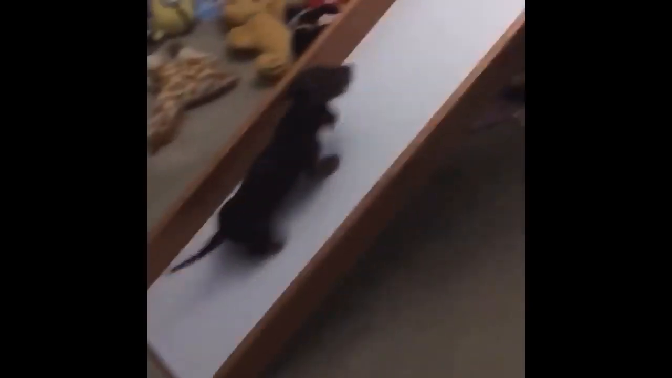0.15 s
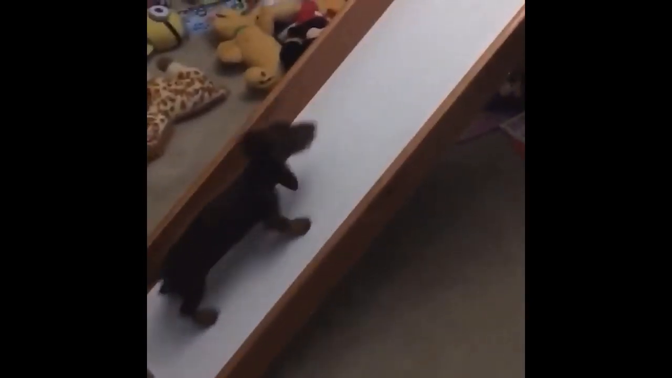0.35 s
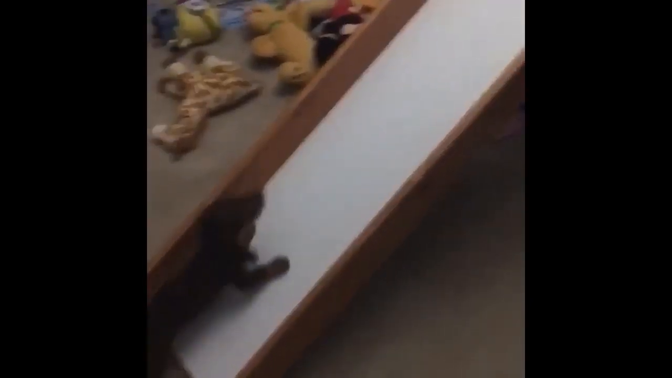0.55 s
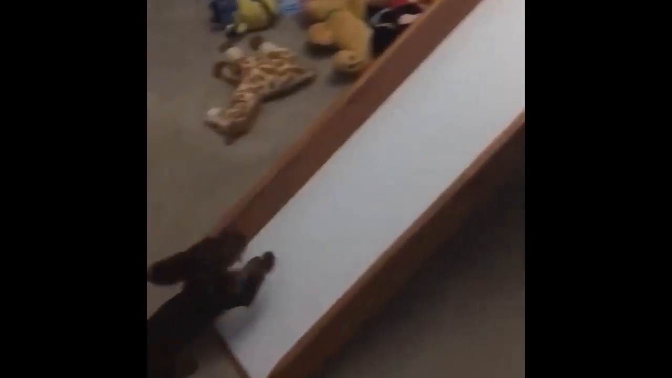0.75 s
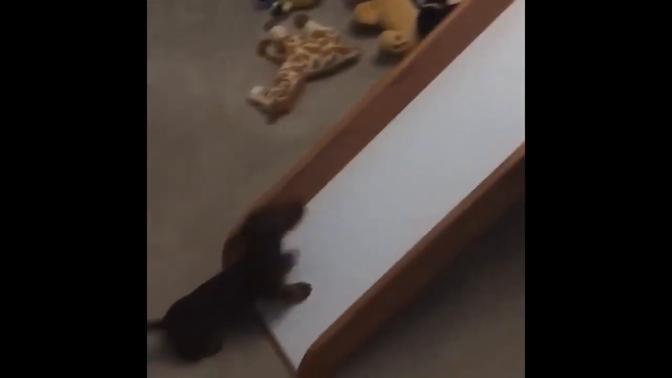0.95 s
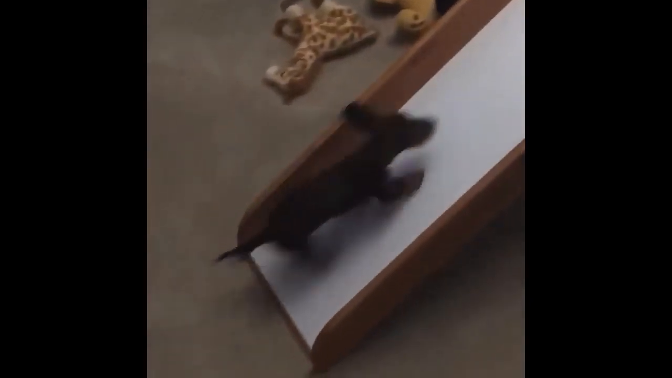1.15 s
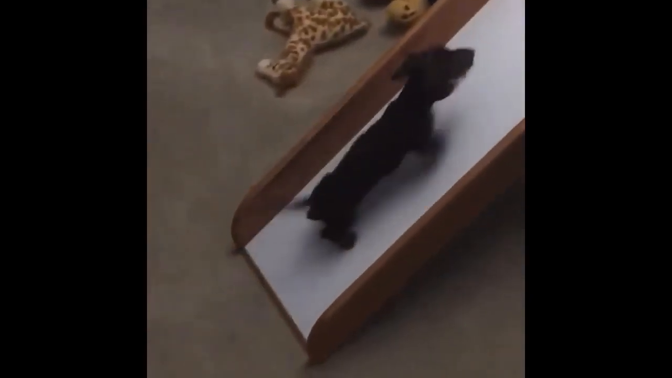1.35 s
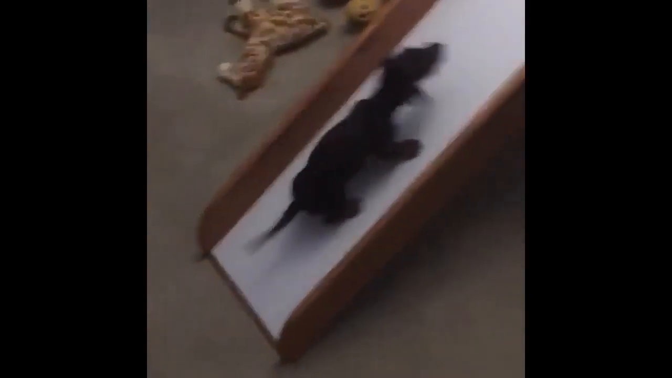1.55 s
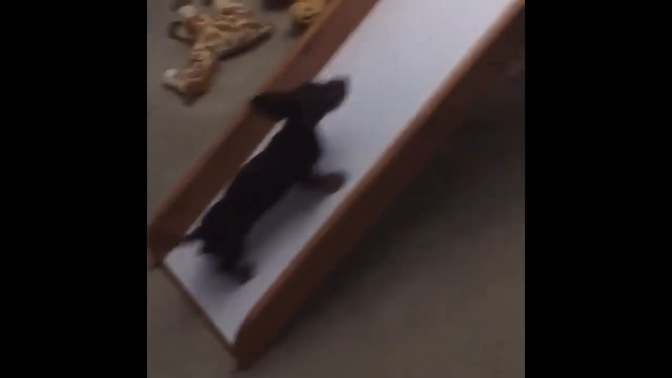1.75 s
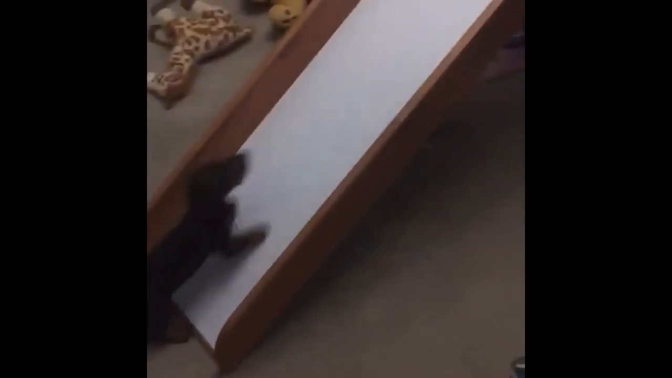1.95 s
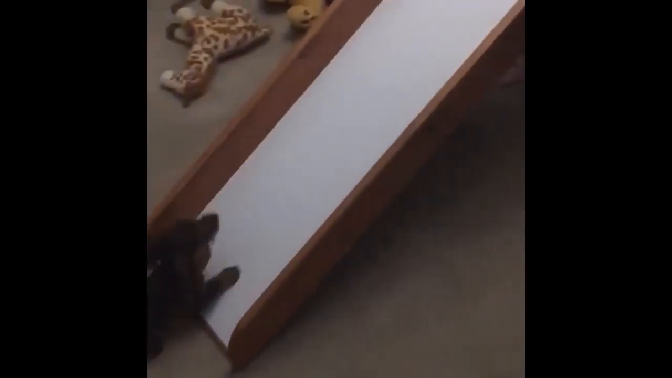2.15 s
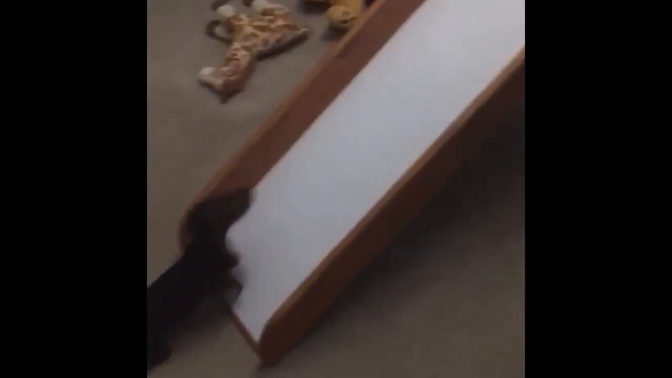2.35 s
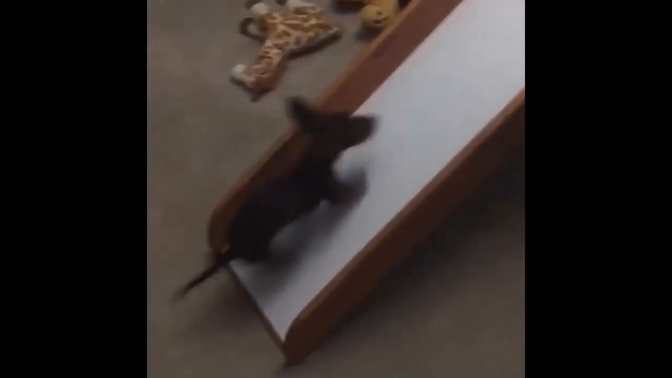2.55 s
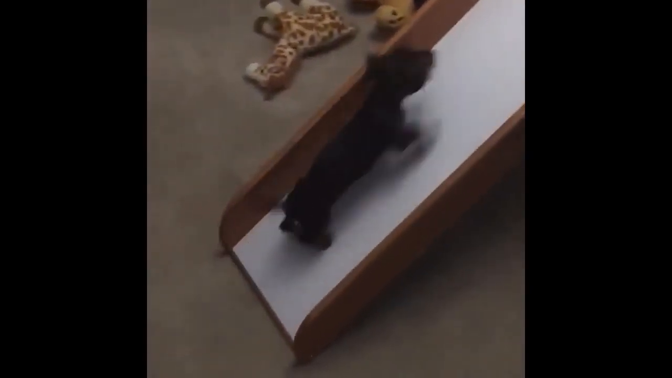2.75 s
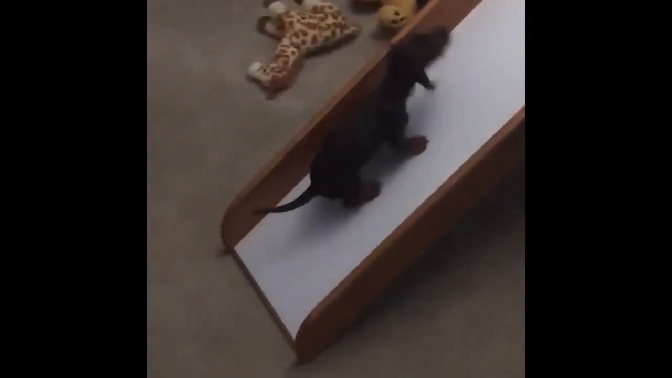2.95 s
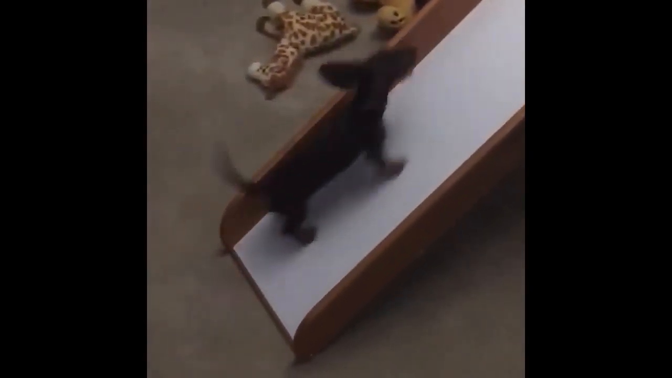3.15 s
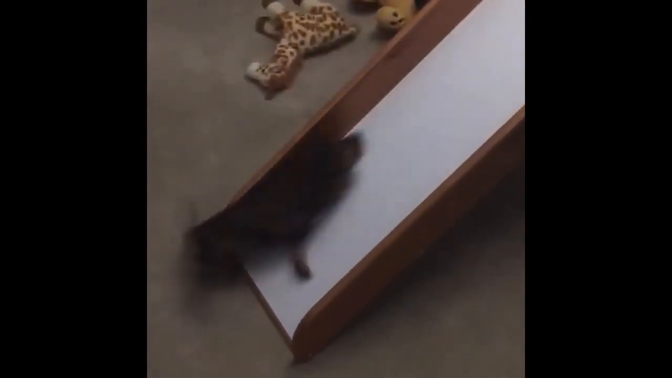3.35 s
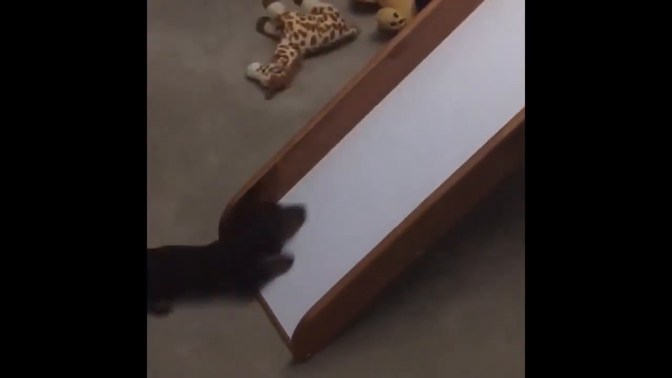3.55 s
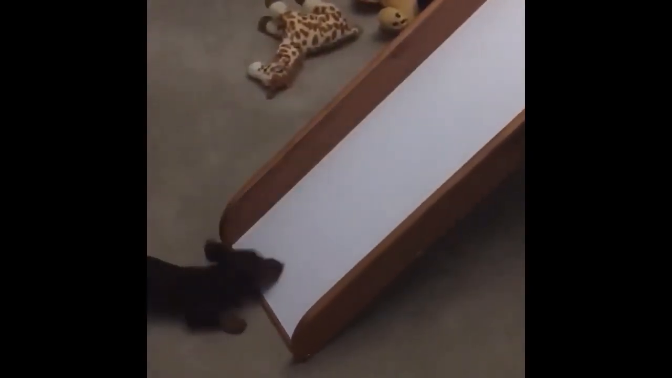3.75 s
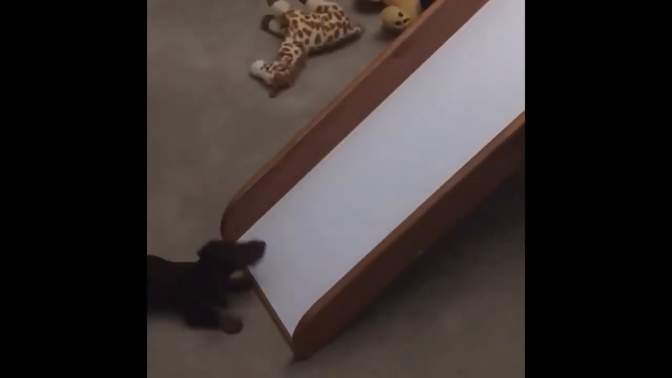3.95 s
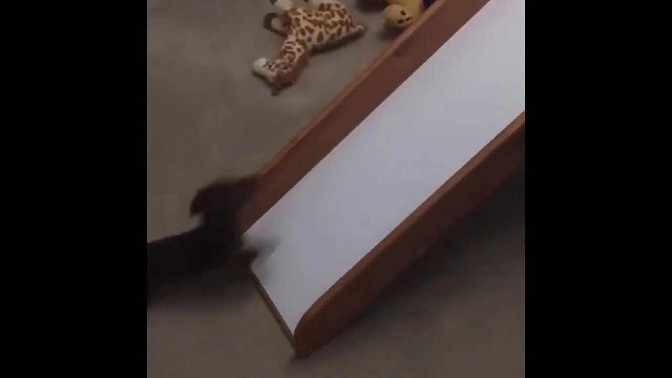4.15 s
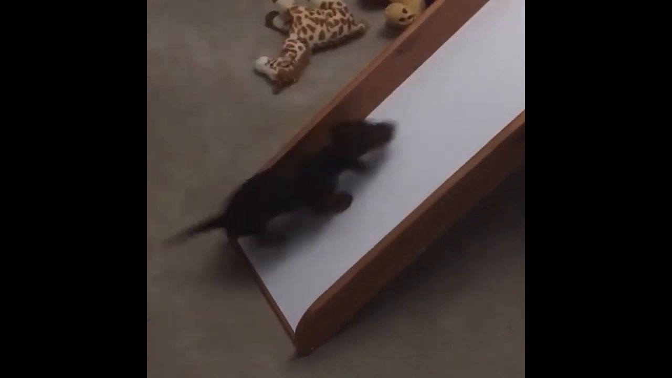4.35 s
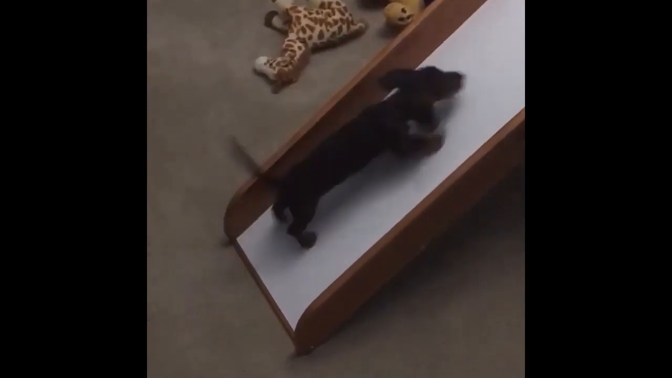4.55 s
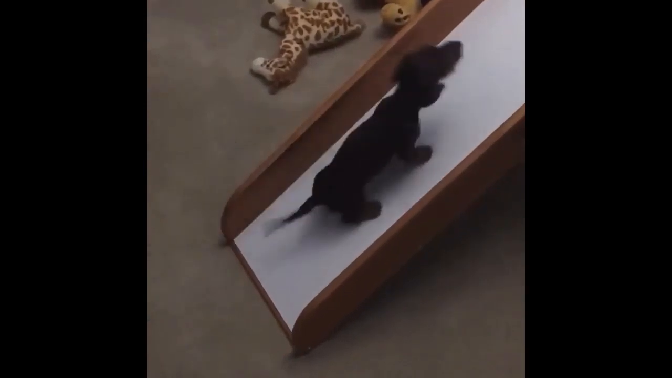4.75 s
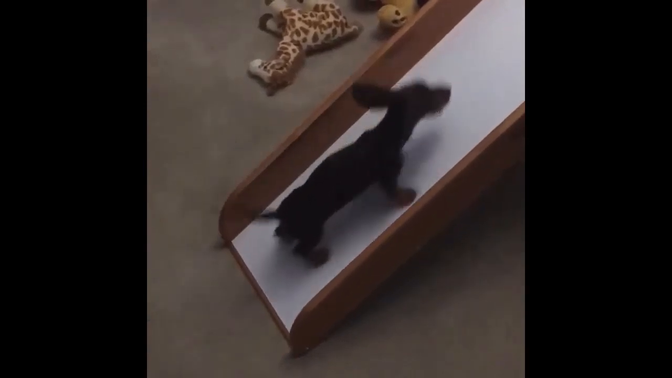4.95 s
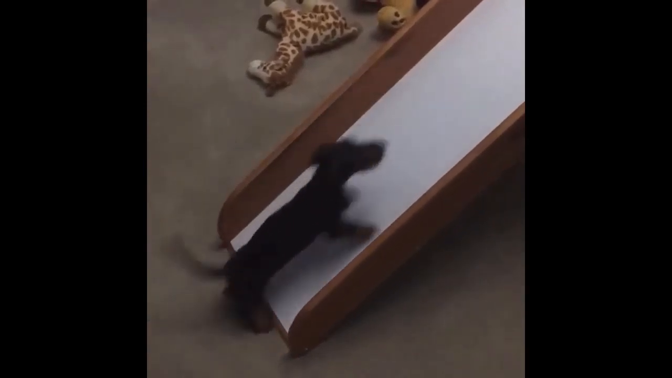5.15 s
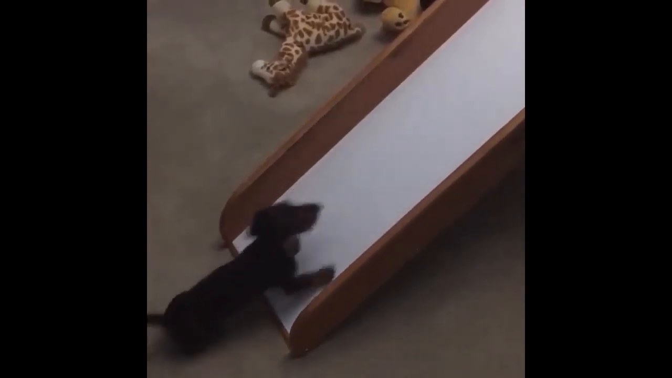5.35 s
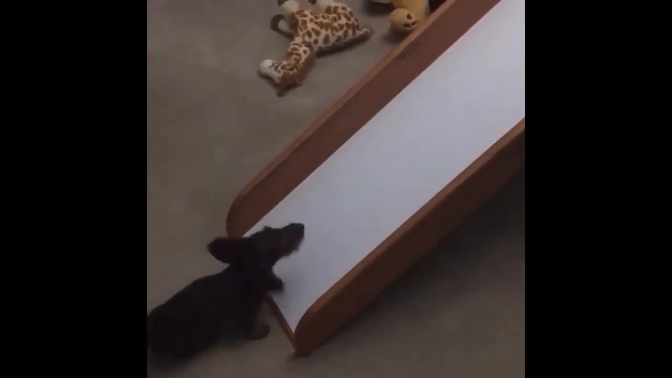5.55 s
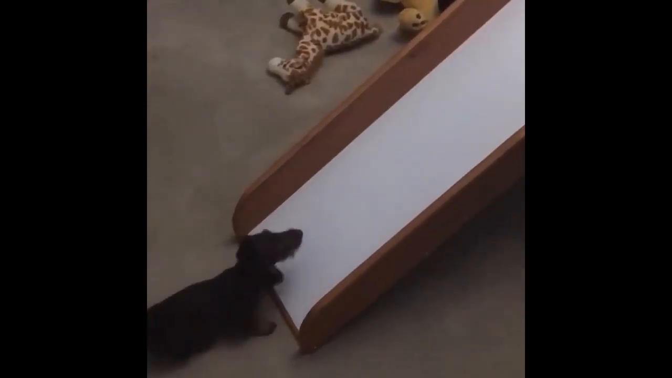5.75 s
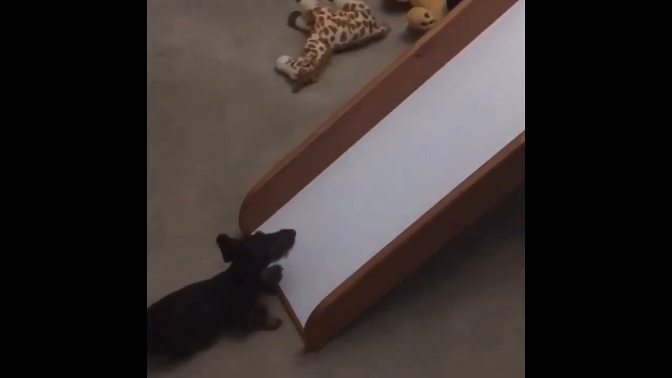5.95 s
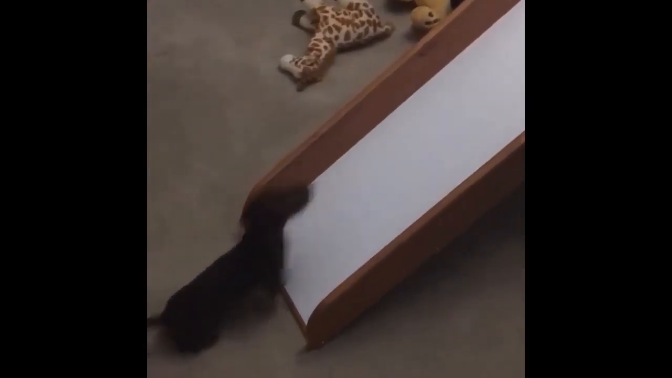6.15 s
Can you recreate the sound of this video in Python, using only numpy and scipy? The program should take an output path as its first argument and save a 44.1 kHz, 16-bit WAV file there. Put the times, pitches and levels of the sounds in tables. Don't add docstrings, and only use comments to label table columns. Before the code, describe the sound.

Irregular bursts of hollow wooden thumps and sharp claw scrabbling alternate with soft scraping slides as a small dog tries to climb a ramp. The heaviest blows come around the middle. Movement then thins out and the dog whimpers, high and nasal, cracking slightly before fading. Close handheld mono sound, short soft indoor echo, faint handling rumble and tiny steady ticks.

```python
import sys
import numpy as np
from scipy import signal
from scipy.fft import rfft, irfft, next_fast_len
from scipy.io import wavfile
from scipy.ndimage import uniform_filter1d

SR = 44100
rng = np.random.default_rng(int(sys.argv[2]) if len(sys.argv) > 2 else 0)


def store_wav(level_fs):
    pcm = np.round(np.clip(np.atleast_2d(level_fs), -1, 1) * 32767)
    wavfile.write(sys.argv[1], SR, pcm.T.astype(np.int16))


def elevation(decibels):
    levels = np.asarray(decibels, float)
    return 10 ** (levels / 20)


N = 272972
FAST = next_fast_len(N)

# (frequency [Hz], level [dB], ring time t60 [s])
BOARD_MODES = [(46.2, -2.5, 0.36), (63.8, -1.5, 0.4), (135.2, 1.5, 0.4), (151.4, 1.5, 0.39),
               (190.4, 6.5, 0.15), (218, -8, 0.65), (284.4, 2, 0.33), (329.3, -6, 0.43),
               (388.6, -0.5, 0.21), (460, -11, 0.13), (526, -7.5, 0.1), (640, 2.5, 0.024),
               (780, -10.5, 0.079), (878, 0.5, 0.014), (1110, -10.5, 0.05), (1146, -12, 0.097),
               (1360, -6, 0.034)]
# (time [s], peak [dB], board note [Hz], weight at 40-100 Hz [dB])
LUNGES = [(0.272, -32, 214, -30), (0.399, -40, 166, -33.5), (0.801, -44, 147, -46),
          (1.058, -38, 260, -36.5), (1.693, -42, 200, -44), (1.764, -44, 108, -51), (2.54, -41.5, 142, -47),
          (2.834, -30, 151, -25.5), (3.142, -90, 218, -31), (3.484, -45, 203, -25),
          (3.509, -25, 100, -21.5), (3.631, -37, 150, -29.5), (3.683, -44, 123, -50),
          (3.895, -58, 126, -41), (4.301, -52, 169, -53), (4.656, -48, 193, -43), (5.349, -44, 152, -45),
          (5.682, -41, 140, -45)]


def level(x, db):
    return x * elevation(db) / np.sqrt(np.mean(x ** 2))


def curve(table):
    s, *columns = np.transpose(table)
    return [np.interp(np.arange(N) / SR, s, c) for c in columns]


def colour(x, points):
    hz, db = np.transpose(points)
    f = np.fft.rfftfreq(FAST, 1 / SR) + 1
    gain = elevation(np.interp(np.log(f), np.log(hz), db, left=-80))
    return irfft(rfft(x, FAST) * gain, FAST)[:N]


def band(x, lo_hz, hi_hz, order=2):
    edges = [lo_hz, min(hi_hz, .45 * SR)]
    return signal.sosfilt(signal.butter(order, edges, "band", fs=SR, output="sos"), x)


def walk(rate):
    k = int(SR / rate)
    steps = np.repeat(rng.standard_normal(N // k + 1), k)
    return 1.48 * uniform_filter1d(uniform_filter1d(steps, k), k)[:N]


def add(out, s, sound):
    i = max(int(s * SR), 0)
    out[i:i + len(sound)] += sound[:N - i]


def landings():
    # (time [s], peak [dB], board note [Hz], knock at 450-1500 Hz [dB])
    slaps = [(0.004, -34, 218, -36.5), (0.096, -29, 158, -35.5), (0.239, -38, 168, -35.5),
             (0.386, -38, 169, -33.5), (1.034, -28, 241, -41), (1.119, -44, 119, -48),
             (1.286, -31, 194.4, -37.5), (1.389, -29.5, 190, -40), (1.414, -27.5, 180, -40),
             (1.451, -32.5, 150, -43.5), (1.521, -41, 287, -39.5), (1.584, -33.5, 129, -43),
             (2.289, -35, 167, -50), (2.736, -30.5, 188, -37.5), (2.808, -31.5, 188, -52),
             (2.82, -21.5, 185, -28), (2.922, -32.5, 158, -43), (2.975, -31, 146, -41),
             (3.112, -32, 205, -33), (3.417, -37.5, 198, -50), (3.449, -19.5, 174, -26.5),
             (3.476, -19.5, 226, -21.5), (3.615, -36, 316, -33.5), (4.111, -45, 314, -48),
             (4.467, -31.5, 202, -37.5), (4.586, -19.5, 177.6, -24.5), (4.7, -30.5, 157, -37.5),
             (4.734, -30, 200, -35.5)]
    # (time [s], peak [dB], board note [Hz])
    pats = [(0.67, -40.5, 186), (0.922, -45, 168), (1.83, -44.5, 275), (2.098, -43.5, 128),
            (2.704, -41.5, 216), (3.284, -49, 172), (3.844, -46.5, 169), (3.897, -52, 125),
            (4.88, -41.5, 171), (5.006, -47, 148), (5.313, -44, 152)]
    rows = [(s, db, hz, db - 12.5, knock, 0.89, 0) for s, db, hz, knock in slaps]
    rows += [(s, db, hz, weight, db - 16, 0.47, -10) for s, db, hz, weight in LUNGES]
    rows += [(s, db, hz, db - 9, db - 8, 1, 0) for s, db, hz in pats]
    return rows


def paws():
    out, t = np.zeros(N), np.arange(SR // 3) / SR
    hz, mode_db, t60 = np.array(BOARD_MODES).T[:, :, None]
    push_s, damp_power = .006, 0.27
    hard_damp = 0.22
    rows = landings()
    chance = rng.standard_normal((len(rows), 2, len(BOARD_MODES), 1))
    for row, (size, detune) in zip(rows, chance):
        s, peak_db, note_hz, weight_db, knock_db, ring, muffle_db = row
        near_db = peak_db + muffle_db - 9.5 - 9 * np.abs(np.log2(hz / note_hz))
        db = np.where(hz < 100, weight_db + 3.5, np.where(hz < 450, near_db, knock_db - 0.5))
        db = db + mode_db + 1.9 * size
        rise = (1 - np.exp(-t * hz / 0.5)) ** 2
        ring_share = max(ring * elevation(-hard_damp * max(peak_db + 31.0, 0)), .2)
        pad_damping = np.where(hz < 450, np.minimum(note_hz / hz, 1) ** damp_power, 1)
        fade = elevation(-60 * t / (t60 * ring_share * pad_damping))
        rings = elevation(db) * rise * fade * np.sin(2 * np.pi * hz * (1 + 0.0445 * detune) * t + 3 * detune)
        push = (t / push_s) * np.exp(1 - t / push_s)
        fall_s = .022 if muffle_db else .035
        turns = 1.22 * note_hz * fall_s * (1 - np.exp(-t / fall_s))
        slap = elevation(peak_db - 4.0) * push * np.sin(2 * np.pi * turns)
        add(out, s - .0002, rings.sum(axis=0) + slap)
    return out


def thumps():
    # (time [s], peak [dB], start pitch [Hz], end pitch [Hz])
    blows = [
        (1.6945, -26.5, 314, 61),
        (1.7655, -35.5, 140, 56),
        (3.136, -29, 88, 54),
        (1.074, -33, 114, 63),
    ]
    sink_s = 0.0071
    out, t = np.zeros(N), np.arange(SR // 8) / SR
    for s, db, start_hz, end_hz in blows:
        turns = end_hz * t + (start_hz - end_hz) * sink_s * (1 - np.exp(-t / sink_s))
        rise_s = .006 * np.sqrt(330 / start_hz)
        push = (t / rise_s) * np.exp(1 - t / rise_s)
        add(out, s, -elevation(db) * push * np.sin(2 * np.pi * turns))
    return out


def raps():
    # (time [s], peak [dB], note [Hz])
    knocks = [(0.094, -30, 1280), (0.237, -32, 640), (0.387, -27, 1172), (1.107, -32, 721),
              (1.46, -34, 635), (1.827, -30.5, 1730), (2.083, -38, 1180), (2.294, -33.5, 790),
              (2.369, -51, 1360), (2.42, -36, 1380), (2.505, -36, 1560), (2.706, -37, 592),
              (2.821, -33, 666), (2.921, -31, 1220), (3.111, -28.5, 595), (3.285, -30, 1420),
              (3.447, -19, 604), (3.485, -23, 690), (3.529, -27.5, 1180), (3.618, -32, 590),
              (4.102, -43, 610), (4.465, -29.5, 680), (4.548, -38, 1540), (4.587, -25.5, 606),
              (4.695, -29, 600), (4.96, -43, 1640), (0.008, -36.5, 520), (0.028, -34, 330),
              (0.274, -37, 440), (1.035, -31, 425), (1.054, -31, 380), (1.085, -38, 400),
              (0.925, -42.5, 328), (1.284, -34.5, 480), (1.79, -39, 1200), (2.432, -39, 1350),
              (2.451, -39, 880), (2.467, -39, 1300), (1.39, -38, 560), (1.413, -38, 640), (1.521, -37, 620),
              (3.305, -38, 650)]
    ring_cycles, twin_ratio, twin_db = 15.6, 1.914, -8
    out, t = np.zeros(N), np.arange(SR // 10) / SR
    for s, db, hz in knocks:
        twin_hz = hz * twin_ratio if hz < 900 else hz / twin_ratio
        fade = (1 - np.exp(-t / 0.0005)) * elevation(-60 * t * np.sqrt(hz * 800) / ring_cycles)
        modes = np.sin(2 * np.pi * hz * t) + elevation(twin_db) * np.sin(2 * np.pi * twin_hz * t)
        add(out, s, elevation(db - 1) * fade * modes)
    return out


def claws():
    # (time [s], peak [dB], sharp edge [dB], scratch t60 [s])
    skidding = [(0.0945, -20.5, 3.5, 0.19), (0.275, -28.5, -18, 0.2), (0.388, -24, -25, 0.16),
                (0.926, -32, 3, 0.12), (1.0337, -23.5, 7, 0.14), (1.284, -25, -10, 0.15),
                (1.3314, -25, -17, 0.13), (1.4117, -28, -7, 0.18), (1.5201, -21.5, 1, 0.26),
                (1.5809, -20, -1, 0.19), (1.83, -20.5, -22, 0.096), (1.897, -25, -8, 0.1),
                (2.287, -21, 2, 0.091), (2.7058, -22.5, 2, 0.12), (2.7331, -23, -10, 0.12),
                (2.796, -34, -7, 0.11), (2.825, -25.5, -7, 0.082), (2.9218, -15.5, -10, 0.15),
                (2.9768, -20.5, -14, 0.21), (3.282, -23, -1, 0.26), (3.426, -28, -20, 0.21),
                (3.5205, -26, -28, 0.11), (4.4685, -27, -12, 0.24), (4.6966, -14, 3, 0.068),
                (4.7326, -23, -12, 0.083), (4.773, -35, -17, 0.12), (4.9515, -37, -19, 0.36),
                (5.0007, -24, 2, 0.13), (5.057, -25, -29, 0.18)]
    # (time [s], peak [dB], wood note at 1-1.8 kHz [dB])
    tips = [(1.461, -30, -9), (1.706, -27, -29), (2.8692, -28, -36), (3.1115, -32, 0), (3.494, -21.5, -8.5),
            (3.531, -23.5, -8), (3.6196, -29.5, -3), (3.88, -32.5, -4.5), (4.301, -48, 0), (4.594, -27, -7),
            (4.662, -34, 0.5), (4.905, -37.5, -14), (5.43, -32, -9), (5.774, -42, -6), (6.0197, -53, -3)]
    strikes = [(s, db, -14, edge, t60) for s, db, edge, t60 in skidding]
    strikes += [(s, db, wood, -44, 0.071) for s, db, wood in tips]
    out, t = np.zeros(N), np.arange(SR // 5) / SR
    chance = rng.standard_normal((len(strikes), 2, len(t)))
    for (s, peak_db, wood_db, edge_db, t60), (noise, grit) in zip(strikes, chance):
        tick = np.exp(-t / 0.00025)
        scratch = 0.36 * (1 - np.exp(-t / 0.00058)) * elevation(-60 * t / max(t60, .01))
        skid = noise * elevation(3.1 * grit) * (tick + scratch)
        parts = [(band(skid, 3620, 5250), peak_db - 15.0), (band(skid, 3890, 8720), peak_db - 6.0),
                 (band(skid, 1056, 1760), peak_db + wood_db - 3.5),
                 (band(skid, 7700, 13400), peak_db + edge_db - 20.5)]
        add(out, s - .0005, sum(elevation(db) * p / np.abs(p).max() for p, db in parts))
    return out


def scrapes():
    # (time [s], rms [dB], swell [s], fade [s], start [Hz], end [Hz])
    rubs = [
        (0.169, -50.5, 0.021, 0.0084, 3480, 4170),
        (1.095, -37, 0.032, 0.025, 1140, 3700),
        (2.49, -47, 0.015, 0.025, 890, 1580),
        (4.09, -60, 0.016, 0.026, 900, 1230),
    ]
    out, t = np.zeros(N), np.arange(SR // 5) / SR
    for s, db, swell, fade, start_hz, end_hz in rubs:
        roughness = 6.7 * uniform_filter1d(rng.standard_normal(len(t)), 64)
        grit = rng.standard_normal(len(t)) * elevation(2.9 * roughness)
        shape = np.where(t < swell, t / swell, np.exp(-(t - swell) / fade))
        along = np.clip(t / swell, 0, 1)
        dull = level(band(grit, 0.5 * start_hz, 1.9 * start_hz), db)
        bright = level(band(grit, 0.74 * end_hz, 1.36 * end_hz), db)
        add(out, s, shape * ((1 - 0.54 * along) * dull + along * bright))
    return out


def slides():
    # (full speed from [s], to [s], hiss [dB], extra drag of a pressed pad [dB])
    slips = [(0, 0.03, -51, 1), (0.314, 0.393, -53, 2.5), (0.373, 0.608, -53.5, 2),
             (0.586, 0.677, -49.5, -2.5), (.69, 0.793, -54.5, 1.5), (0.977, 1.19, -65.5, 1),
             (1.45, 1.8, -57.5, 3.5), (1.76, 2.026, -51, -0.5), (2.063, 2.169, -48.5, -3.5),
             (2.13, 2.215, -53.5, -1), (2.267, 2.475, -58, 5.5), (2.86, 2.917, -50.5, 0),
             (2.9, 3.286, -57.5, 3), (3.305, 3.39, -48, -4.5), (3.417, 3.482, -45.5, -2),
             (3.46, 3.553, -51, -10), (3.586, 3.71, -56, 2), (3.69, 3.854, -54, -1),
             (3.995, 4.55, -83, 6.5), (4.615, 4.696, -55.5, 0.5), (4.68, 4.781, -54, 0),
             (4.78, 4.95, -67, 1), (4.969, 5.304, -54, 1), (5.093, 5.12, -52, -10), (5.26, 5.403, -52, 0),
             (5.43, 5.675, -55.5, -1), (2.505, 2.535, -54.5, 0), (3.5, 3.533, -54, -10)]
    dig_db = [0.5, 0, -0.8, 0, 4.5, -0.5, -0.5, 0.5, 1.5, 1, 3.5, -1.5, 0, -2.5, -10, -1, -2.5, 1, 11, -1,
              -3.5, 1, 2.5, -1.5, 5, -1, -5, 10]
    gather_db_s, stop_db_s = 159, 240
    t = np.arange(N) / SR
    start, end, db, press = np.array(slips).T[:, :, None]
    hiss = db - gather_db_s * np.maximum(start - t, 0) - stop_db_s * np.maximum(t - end, 0)
    scratch = -44 + 1.19 * (hiss + 44) - 0.12 * press + np.array(dig_db)[:, None]
    return hiss.max(axis=0), (hiss + press).max(axis=0), scratch.max(axis=0)


def slipping():
    # (frequency [Hz], level per Hz [dB])
    drag_spectrum = [(150, -43), (250, -8), (282, -4), (510, -21), (557, -17), (698, -5.5), (955, -6),
                     (1200, 1), (2760, -3), (4190, 7.5), (4990, 0.5), (9010, 1), (16000, -22.5)]
    grains = rng.standard_normal(N) * elevation(2.5 * np.minimum(rng.exponential(size=N), 3))
    spectrum = rfft(level(colour(grains, drag_spectrum), 0), FAST)
    octave = np.log2(np.fft.rfftfreq(FAST, 1 / SR) + 1)
    hiss_db, drag_db, scratch_db = slides()
    out, judder_db = 0, 1.3 * walk(45)
    for hz in 250 * 2 ** np.arange(0, 6.5, .5):
        share = np.clip(1 - np.abs(octave - np.log2(hz)) / .5, 0, 1)
        if hz < 2400:
            db = drag_db + 8.5
        elif hz < 6800:
            db = hiss_db + 6.5
        else:
            db = scratch_db + 5.0
        out = out + irfft(spectrum * share, FAST)[:N] * elevation(db + judder_db + 2.0 * walk(18))
    return out


def whine():
    # (time [s], pitch [Hz], hum through the nose [dB], mouth [dB])
    calls = [
        [(5.36, 898, -42, -75), (5.376, 897, -48, -70), (5.39, 1054, -51, -74), (5.412, 1128, -37, -66),
         (5.425, 1213, -51, -66), (5.433, 1215, -31.5, -60), (5.441, 1240, -50, -55)],
        [(5.441, 1230, -49, -56), (5.45, 1237, -33.5, -51), (5.462, 1248, -43, -51), (5.498, 1228, -43, -61),
         (5.52, 1207, -30, -52), (5.543, 1178, -40, -62), (5.556, 1165, -35, -55), (5.573, 1130, -30, -49.5),
         (5.585, 1110, -54, -50)],
        [(5.585, 1110, -56, -59), (5.606, 1145, -41, -57), (5.626, 1135, -50, -54), (5.645, 1140, -55, -51),
         (5.666, 1124, -43, -52), (5.68, 1117, -61, -61), (5.715, 1134, -56, -63)],
        [(5.725, 1515, -57, -63), (5.742, 1522, -59, -54), (5.768, 1560, -60, -55), (5.8, 1512, -52, -52.5),
         (5.826, 1488, -54, -49.5), (5.866, 1448, -51, -49), (5.878, 1440, -53, -58), (5.925, 1420, -60, -69),
         (6.0, 1160, -68, -105)],
        [(5.64, 1237, -59, -60), (5.664, 1273, -56, -51), (5.685, 1310, -53, -48), (5.7, 1395, -53, -60),
         (5.72, 1550, -64, -62)],
        [(6.012, 1080, -61, -68), (6.028, 1062, -57, -61), (6.056, 1000, -64, -63), (6.084, 945, -66, -64),
         (6.11, 885, -62, -65), (6.126, 862, -62, -61), (6.165, 838, -55, -65), (6.18, 812, -58, -71)],
    ]
    # (frequency [Hz], level [dB])
    open_mouth = [(2300, -9), (3300, 1), (4350, 6.5), (4800, -5), (5720, -3), (6000, 6), (7500, -16),
                  (9000, -37)]
    # (frequency [Hz], level [dB])
    shut_mouth = [(1900, -25), (2130, -8), (2800, -26), (3200, -10), (3500, -22), (4050, 2), (5600, -6),
                  (7000, -28)]
    lips_shut = [False, False, False, False, True, True]
    tilts = [-6, -11, -8, -4, 0, 0]
    depths = [.5, .5, .7, .8, 1, .7]
    # (from [s], to [s], depth [0-1])
    cracks = [
        (5.615, 5.645, .5),
        (5.772, 5.788, .5),
    ]
    out = np.zeros(N)
    t = np.minimum(np.arange(N) / SR, calls[-1][-1][0] - .01)
    tremble = 1 + .005 * walk(110) + .009 * walk(500)
    waver = [(1.5 + .4 * k) * walk(90) + 2.8 * min(k, 1) * walk(30) for k in range(9)]
    crack = sum(d * np.clip(np.minimum(t - a, b - t) / .004 + .5, 0, 1) for a, b, d in cracks)
    rasp = level(colour(rng.standard_normal(N), open_mouth), -10)
    for call, tilt, depth, shut in zip(calls, tilts, depths, lips_shut):
        mouth_hz, shape_db = np.transpose(shut_mouth if shut else open_mouth)
        hz, nose_db, mouth_db = curve(call)
        partial_db = [nose_db]
        for n in range(2, 10):
            resonance_db = np.interp(np.log(n * hz), np.log(mouth_hz), shape_db)
            partial_db.append(mouth_db + resonance_db + tilt * np.log2(n * hz / open_mouth[2][0]))
        strain = np.clip((mouth_db + 53.5) / 4.5, 0, 1)
        flutter_phase = 2 * np.pi * np.cumsum(98 * (1 + .07 * waver[0])) / SR
        flutter = 1 + strain * (.7 * np.sin(flutter_phase) - .2)
        phase = 2 * np.pi * np.cumsum(hz * tremble) / SR
        gate = np.clip(np.minimum(t - call[0][0], call[-1][0] - t) / .006 + .5, 0, 1)
        voice = rasp * elevation(mouth_db)
        for k, (db, w) in enumerate(zip(partial_db, waver)):
            beating = flutter if k else 1
            if k > 1:
                beating = flutter * (1 + crack * np.cos(phase / 2))
            voice = voice + elevation(db + 3.5 + depth * w) * beating * np.sin((k + 1) * phase)
        out += gate * voice
    return out


def room(x):
    t60, echo_db = 0.27, -9.5
    t = np.arange(SR // 2) / SR
    noise = rng.standard_normal(len(t)) * (t > .004)
    low = band(noise, 54.0, 1610) * elevation(-60 * t / t60)
    high = band(noise, 1280, 21000) * elevation(-95 * t / t60)
    tail = low + 0.63 * high
    return x + elevation(echo_db) * signal.fftconvolve(x, tail / np.sqrt(np.sum(tail ** 2)))[:N]


def swaying():
    rest_db, jolt_db, settle_s = -60, -41, 0.065
    lunges = np.array(LUNGES)
    since = np.arange(N) / SR - lunges[:, :1]
    jolts = elevation(lunges[:, 3:] + jolt_db) * (since > 0) * np.exp(-np.abs(since) / settle_s)
    rumble_db = np.minimum(20 * np.log10(elevation(rest_db) + jolts.max(axis=0)), -54)
    rumble = level(band(rng.standard_normal(N), 35, 75), 0) * elevation(rumble_db + 2.5 + 2.5 * walk(12))
    shake = rng.standard_normal(N) * elevation(4.5 * walk(25))
    hum = sum(elevation(db) * band(shake, hz * 0.76, hz * 1.3, order=1) for hz, db, _ in BOARD_MODES[2:9])
    return rumble + level(hum, 0) * elevation(slides()[1] - 7.5)


def camera_ticks():
    clicks, times = np.zeros(N), np.arange(.0388, N / SR - .02, 1 / 20)
    size, double = rng.standard_normal(len(times)), rng.random(len(times))
    clicks[(times * SR).astype(int)] = elevation(2.5 * size)
    clicks[((times + .0155) * SR).astype(int)] = .7 * (double < .17)
    ticks = band(clicks, 4900, 7300, order=4)
    ticks = ticks + .2 * band(clicks, 2500, 5000, order=1) + .17 * band(clicks, 11500, 15000)
    return ticks * elevation(-46.5) / np.abs(ticks).max()


def room_air():
    # (frequency [Hz], level per Hz [dB])
    air_spectrum = [(100, 5), (500, -7), (1300, -10.5), (2400, -22.5), (4300, -17.5), (7000, -26),
                    (8200, -29), (8900, -19), (10200, -29), (14500, -28), (16000, -42)]
    return level(colour(rng.standard_normal(N), air_spectrum), -66.5) * elevation(1.0 * walk(5.3))


def scene():
    board = paws() + raps() + claws() + scrapes() + slipping()
    mono = room(board + whine()) + thumps() + swaying() + room_air() + camera_ticks()
    return np.array([mono, mono])


def roll_off(x):
    return signal.sosfilt(signal.butter(12, 16360, fs=SR, output="sos"), x)


def record(dry):
    # (frequency [Hz], width [Hz], level [dB])
    port = (4150, 145, 4.1)
    hz, width, db = port
    ported = dry + (elevation(db) - 1) * band(dry, hz - width / 2, hz + width / 2, order=1)
    top = signal.sosfilt(signal.ellip(8, .2, 70, 15800, fs=SR, output="sos"), ported)
    return roll_off(top)


dry = scene()
out = record(dry)
store_wav(out)
```